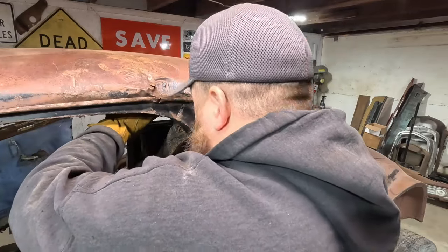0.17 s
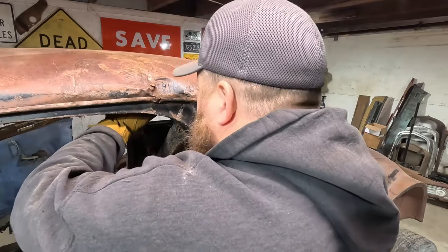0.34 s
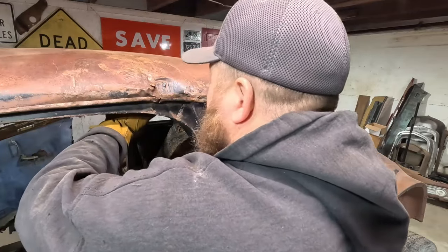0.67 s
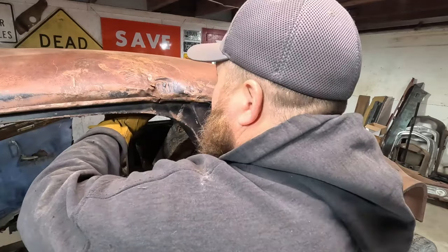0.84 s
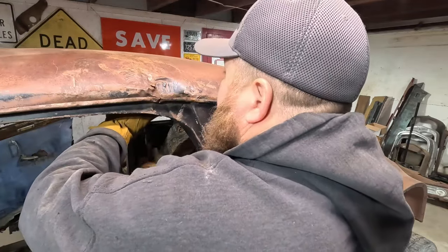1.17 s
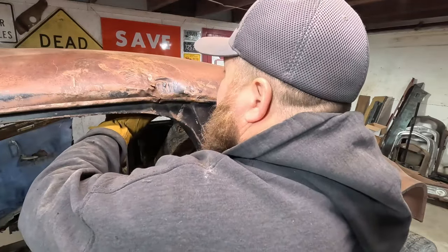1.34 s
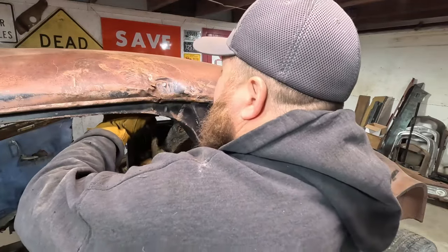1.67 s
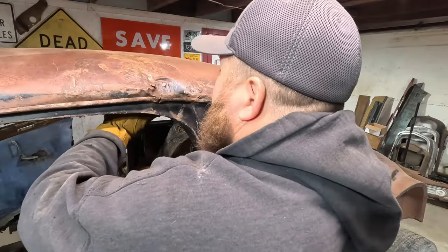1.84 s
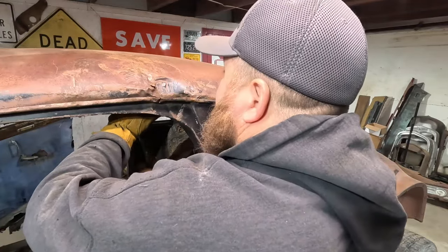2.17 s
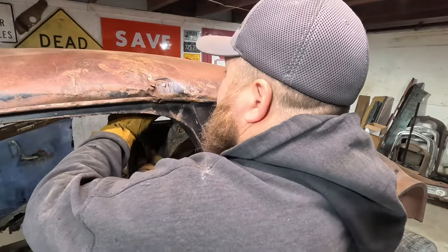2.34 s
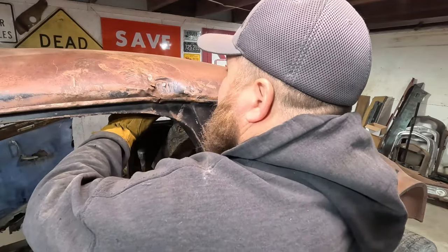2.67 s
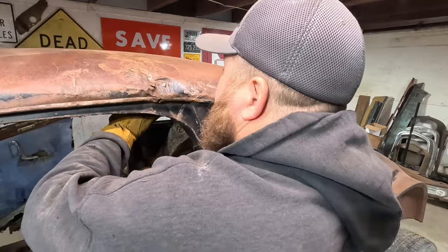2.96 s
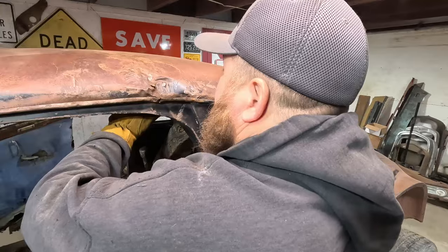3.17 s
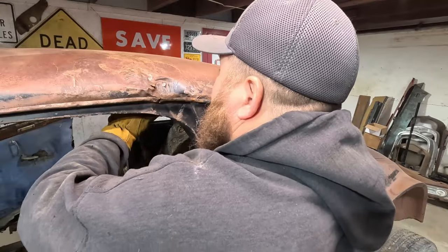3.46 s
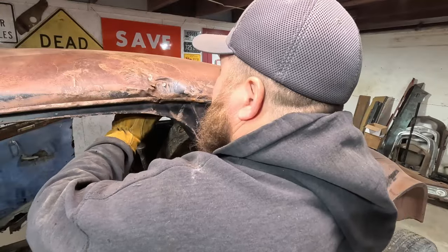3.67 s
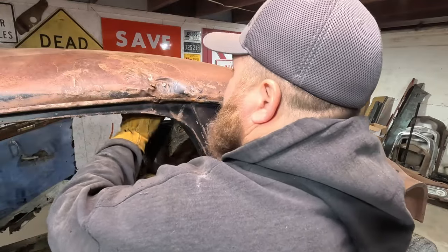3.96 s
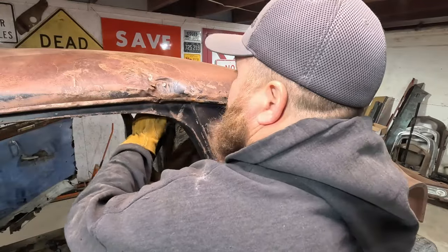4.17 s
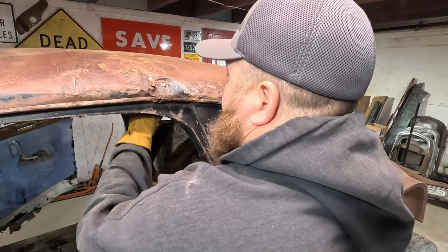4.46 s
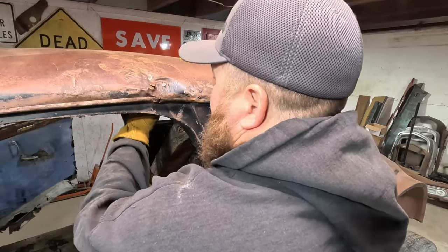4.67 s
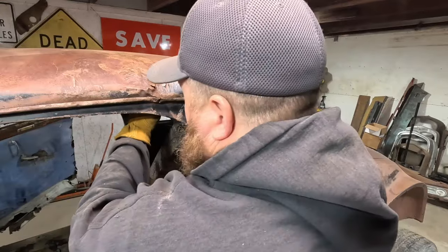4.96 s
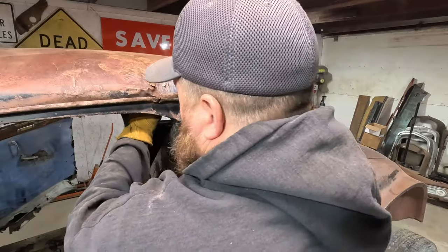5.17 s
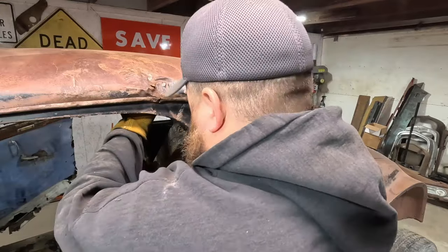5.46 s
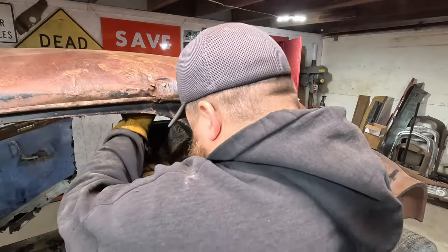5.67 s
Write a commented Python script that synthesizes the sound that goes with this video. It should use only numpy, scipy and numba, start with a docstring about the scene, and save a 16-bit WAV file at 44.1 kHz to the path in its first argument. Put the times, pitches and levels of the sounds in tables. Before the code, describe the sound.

A hammer strikes a chisel held against the sheet steel of an old car body in a workshop. The first blow lands at about 0.3 seconds, and five more follow at roughly 1.2, 1.6, 2.4, 2.9 and 3.3 seconds. Each is a sharp crack, after which the large panel booms and clangs, its ring fading over about a second. The second and fourth blows are somewhat softer. Small loose metal parts tinkle faintly, most clearly just before 1 second, along with a light knock.

After the last blow the ring sinks into a faint low drone. From about 4.4 to 5.7 seconds the tool is shifted, with quiet, irregular knocks, short dull rubs on the steel and a few tiny tinkles. A steady low room hum runs underneath throughout. A small microphone holds the loud ring down, and a very faint stutter comes just ahead of each blow.

```python
"""In a workshop, a hammer drives a chisel against the sheet steel of an old car body, six blows.
Each blow cracks, then the big panel booms and clangs in hundreds of close modes (its natural tones).
Afterwards the tool is shifted, knocking and rubbing on the steel. Loose parts tinkle and the room hums.
A small microphone with gain control holds the loud ring down, and a faint pre-echo from the
recorder's processing stutters just ahead of each blow."""
import sys
import numpy as np
from scipy import signal
from scipy.fft import rfft, irfft, next_fast_len
from scipy.io import wavfile
from scipy.ndimage import uniform_filter1d
from numba import njit

SR = 44100
rng = np.random.default_rng(int(sys.argv[2]) if len(sys.argv) > 2 else 0)


def transcribe(u):
    """Save the signal u as a 16-bit wav file named by the first command-line argument.

    u: samples, shape (n,) or (channels, n), limited to [-1, 1]; the rate is SR.
    q: integer samples, one column per channel.
    """
    v = np.clip(np.atleast_2d(u).T, -1, 1)
    q = np.round(v * 32767).astype(np.int16)
    wavfile.write(sys.argv[1], SR, q)


N = 256662
FFT_SIZE = next_fast_len(N)

# hammer blows: (time [s], crack [dB], ring [dB], brightness [dB/octave], clank [dB],
# clang of the high modes [dB], clang brightness [dB/octave], pre-echo against the blow [dB])
BLOWS = [(0.250, 2.5, -12, 0.6, -1, -8, 0.5, -7.5), (1.155, -5.5, -18.5, 0.06, 3, -6, -3.5, -31),
         (1.6256, -0.5, -13.5, 0.5, 1, -15.5, -0.5, -23), (2.396, -7.5, -20, 0.28, 5, -5.5, -4, -33.5),
         (2.8785, 1.5, -13, 0.73, -0.5, -18.5, 1.5, -24), (3.339, -2.5, -14.5, 1, 2, -7.5, -2.5, -30.5)]
# how strongly the panel's crowd of close modes rings: (frequency [Hz], level [dB])
CROWD_SPECTRUM = [(24, -61), (40, -28), (130, -20.5), (194, -1), (262, -10.5), (372, -6), (751, -18),
                  (873, -17.5), (1760, -26.5), (2440, -30), (4930, -39.5), (6020, -37), (6800, -43),
                  (9220, -68), (11800, -54), (16000, -118)]
# how long that crowd rings: (frequency [Hz], t60 or time to fade by 60 dB [s])
CROWD_T60 = [(60, 0.91), (200, 0.8), (500, 1.002), (1000, 0.72), (2500, 0.57), (6000, 0.47), (12000, 0.38)]

PRE_ECHO_S, PRE_ECHO_STEP_DB = 0.0106, -10.5  # pre-echo: a faint, stepped stutter ahead of each blow
CLATTER_HZ = 798  # above this the crowd of modes blurs into noise


def undb(db):
    """Turn decibels into a factor to multiply by."""
    return 10 ** (np.asarray(db, float) / 20)


def along(table, hz):
    """Read a (frequency, value) table, with every octave equally wide."""
    frequencies, values = np.transpose(table)
    return np.interp(np.log(hz), np.log(frequencies), values)


def coloured(table):
    """Noise of average (rms) size 1, shaped by a (frequency [Hz], level [dB]) table."""
    hz = np.maximum(np.fft.rfftfreq(FFT_SIZE, 1 / SR), 1)
    noise = irfft(rfft(rng.standard_normal(FFT_SIZE)) * undb(along(table, hz)), FFT_SIZE)[:N]
    return noise / noise.std()


def tilted(colour, db, brightness, clank_db=0, pivot_hz=900, clank_hz=2500):
    """Shift a colour table by db, tip it towards treble or bass, and add a bump for the clank."""
    hz, level = np.transpose(colour)
    clank = clank_db * np.exp(-(np.log2(hz / clank_hz) / 0.45) ** 2)
    return np.c_[hz, level + db + brightness * np.log2(hz / pivot_hz) + clank]


@njit
def ring(n, starts, gains, pole, rise):
    """Add up fading modes; each swells in as the wave fills the steel."""
    out = np.zeros(n)
    for mode in range(len(pole)):
        swing, held_back, event = 0j, 0j, 0
        for i in range(starts[0], n):
            while event < len(starts) and starts[event] == i:
                swing += gains[event, mode]
                held_back += gains[event, mode]
                event += 1
            out[i] += (swing - held_back).imag  # held_back dies sooner, so the tone swells
            swing = swing * pole[mode] + 1e-18
            held_back = held_back * rise[mode] + 1e-18
    return out


def play_modes(times, db, hz, t60, rise_s, phase):
    """Set modes ringing; db and phase have a row for each time and a column for each mode."""
    pole = np.exp(2j * np.pi * hz / SR - np.log(1000) / (t60 * SR))  # turn and fade per sample
    order = np.argsort(times)
    starts = (np.asarray(times)[order] * SR).astype(np.int64)
    gains = (undb(db) * np.exp(1j * phase))[order]
    return ring(N, starts, gains, pole, pole * np.exp(-1 / (rise_s * SR)))


@njit
def follow(x, attack, release):
    """Track loudness, rising fast and falling slowly."""
    level, out = 0., np.empty(len(x))
    for i in range(len(x)):
        level += (abs(x[i]) - level) * (attack if abs(x[i]) > level else release)
        out[i] = level
    return out


def room_hum(level_db=-51.5):
    """The workshop hums with a steady, low noise."""
    # colour of the hum: (frequency [Hz], relative level [dB])
    hum_colour = [(24, -51), (40, -24), (86, -10.5), (142, 4.5), (219, 9.5), (933, -17), (1120, -15),
                  (1970, -17.5), (3800, -26), (7680, -38.5), (9000, -78.5), (11700, -73.5), (19800, -120)]
    return undb(level_db) * coloured(hum_colour)


def tinkles(attack_s=0.004):
    """Small loose metal parts tinkle, each a narrow band of fading noise."""
    # tinkles: (time [s], pitch [Hz], level [dB], t60 [s], spread of pitch [Hz])
    loose_parts = [(.05, 3840, -61, 0.46, 900), (.745, 4840, -57, 0.27, 246), (.965, 3970, -50.5, 0.2, 60),
                   (.965, 1430, -46, 0.3, 29.5), (4.68, 6200, -62, 0.074, 200),
                   (4.89, 5600, -72, 0.12, 194), (5.698, 4660, -64.5, 0.89, 600)]
    size = SR // 2
    hz, age = np.fft.rfftfreq(size, 1 / SR), np.arange(size) / SR
    out = np.zeros(N)
    for time, centre_hz, db, t60, spread in loose_parts:
        band = irfft(rfft(rng.standard_normal(size)) * np.exp(-((hz - centre_hz) / spread) ** 2 / 2))
        envelope = undb(db - 60 * age / t60) * (1 - np.exp(-age / attack_s))
        start = int(time * SR)
        out[start:start + size] += (envelope * band / band.std())[:N - start]
    return out


def rubbing(attack_s=0.012, release_s=0.033, sag_db_per_s=20, drone_start_s=3.95, drone_db=-39.5):
    """Glove and tool stick and slip along the steel, while the handled panel drones ever fainter."""
    # rubbing strokes: (start [s], length [s], level [dB], treble against that level [dB])
    strokes = [(4.48, 0.14, -52, -15.5), (4.581, 0.097, -47, -9.5), (4.668, 0.23, -46, -20),
               (4.94, 0.12, -53, -13), (5.046, 0.19, -53.5, -14), (5.416, 0.11, -66.5, 6.5),
               (5.627, 0.089, -65.5, -0.5)]
    t = np.arange(N) / SR
    grain = undb(39 * uniform_filter1d(uniform_filter1d(rng.standard_normal(N), size=400), size=40))
    dull = coloured([(300, -18), (600, 2), (850, 13.5), (1100, -4.5), (1600, -33), (4000, -100)])
    treble = coloured([(700, -30), (1500, 2), (3000, -5), (5000, -13), (7500, -41), (9000, -55.5),
                       (12000, -110)])
    drone = coloured([(90, -56), (150, -15), (205, 1.5), (250, 0.5), (320, -9), (500, -36), (900, -83)])
    drone_age = t - drone_start_s
    out = drone * np.clip(drone_age / 0.12, 0, 1) * undb(drone_db - 3 * drone_age)
    for start, length, db, treble_db in strokes:
        age = np.maximum(t - start, 0)
        # each stroke sets in, slackens, and dies away once the hand stops
        shape = np.minimum(age / attack_s, 1) * np.exp(-np.maximum(age - length, 0) / release_s)
        out += shape * undb(db - sag_db_per_s * age) * grain * (dull + undb(treble_db) * treble)
    return out


def ring_events(knock_clang_db=-9, knock_decay_share=0.53):
    """List blows, pre-echoes and knocks: time, colour, clang (level, brightness), share of t60."""
    # light knocks of the tool: (time [s], ring [dB], brightness [dB/octave])
    knocks = [(0.933, -45.5, 0), (4.376, -72.5, 7.5), (4.43, -56.5, -3.5), (4.585, -52.5, -6),
              (4.678, -53.5, 2), (4.785, -52.5, -1.5), (4.866, -79, 4), (4.945, -54, -2.5),
              (5.04, -51, -1.5), (5.249, -61, 5.5), (5.449, -60.5, 3.5), (5.637, -64.5, 4.5)]
    # how a blow shares out over the ring: (frequency [Hz], level [dB])
    blow_colour = [(250, 2), (900, 0), (1500, -2.5), (2500, 2.13), (4000, 0.84), (6000, -3.7),
                   (11000, -4.5)]
    # how a knock shares out over the ring: (frequency [Hz], level [dB])
    knock_colour = [(250, 0.5), (900, -1.5), (2500, -8), (6000, -29), (11000, -45)]
    events = [(time, tilted(blow_colour, db, bright, clank), clang, 1)
              for time, _, db, bright, clank, *clang, _ in BLOWS]
    for time, _, db, bright, clank, clang_db, clang_bright, pre_echo_db in BLOWS:
        for k in range(4):  # steps of the pre-echo, the earlier the fainter
            drop_db = pre_echo_db + k * PRE_ECHO_STEP_DB
            colour = tilted(blow_colour, db + drop_db, bright, clank)
            events.append((time - (k + 1) * PRE_ECHO_S, colour, (clang_db + drop_db, clang_bright), 1))
    # the gloved hand rests on the steel and shortens the clatter of the knocks
    for time, db, bright in knocks:
        colour = tilted(knock_colour, db, bright)
        events.append((time, colour, (db + knock_clang_db, bright), knock_decay_share))
    times, colours, clang, decay_share = zip(*events)
    return np.array(times), colours, np.array(clang), np.array(decay_share)


def panel_clatter(level_db=-3, knock_rise_cycles=13, blow_rise_cycles=63):
    """The panel's high modes overlap into noise; each quarter octave fades at its own pace."""
    hz = np.maximum(np.fft.rfftfreq(FFT_SIZE, 1 / SR), 1)
    spectrum = rfft(rng.standard_normal(FFT_SIZE)) * np.sqrt(SR / 2)
    spectrum *= undb(level_db + along(CROWD_SPECTRUM, hz))
    times, colours, _, decay_share = ring_events()
    grid = np.arange(0, N + 16, 16)  # loudness is worked out every 16 samples
    age = np.maximum(grid / SR - times[:, None], 0)
    rise_cycles = np.where(decay_share < 1, knock_rise_cycles, blow_rise_cycles)[:, None]
    out = np.zeros(N)
    for centre_hz in CLATTER_HZ * 2 ** (np.arange(18) / 4):
        window = np.cos(np.pi / 2 * np.clip(4 * np.log2(hz / centre_hz), -1, 1))
        band = irfft(spectrum * window, FFT_SIZE)[:N]
        db = np.array([along(c, centre_hz) for c in colours]) + 1.5 * rng.standard_normal(len(times))
        t60 = along(CROWD_T60, centre_hz) * decay_share[:, None]
        swell = 1 - np.exp(-age * centre_hz / rise_cycles)
        power = (swell * undb(db[:, None] - 60 * age / t60)) ** 2
        out += band * np.interp(np.arange(N), grid, np.sqrt(power.sum(axis=0)))
    return out


def panel_ring(count=130, crowd_db=4, scatter_db=2, clang_hz=1500, bloom_s=0.17):
    """The sheet steel booms in a crowd of low modes and clangs in strong ones, in close threes."""
    # modes that stand out of the ring: (frequency [Hz], level [dB], t60 [s])
    strong_modes = [(135.6, -15, 1.2), (209.2, -3.5, 1.71), (226.7, -6.5, 2.1), (256, -6.5, 1.5),
                    (300.3, 1, 1.58), (367.5, 1, 1.04), (421.5, -6.5, 1.8), (498, 3, 1.1), (617.4, -3, 1.1),
                    (655, -5, 1.1), (814, -2.5, 0.92), (944, -6.5, 0.86), (1042, -5.5, 0.96),
                    (1350, -23.5, 1.5), (1549, -21.5, .7), (1895, -19.5, 0.67), (1920, -15, .6),
                    (2000, -8, 0.46), (2220, -8, 0.37), (2369, -17.5, 0.34), (2860, -6, 0.37),
                    (2940, -7.5, .3), (3120, -14, 0.26), (3860, -17.5, 0.54), (4280, -23, 0.62),
                    (4540, -20, .4), (5600, -20, 0.37), (5870, -12, 0.34), (6000, -15.5, 0.36),
                    (6200, -22.5, 0.3)]
    crowd_hz = 45 + (CLATTER_HZ - 45) * (np.arange(count) + rng.random(count)) / count
    centre_hz, strong_db, strong_t60 = np.repeat(strong_modes, 3, axis=0).T
    side = np.tile([-1, 0, 1], len(strong_modes))  # a weaker neighbour below and above each
    gap_hz = (3.5 + 0.00425 * centre_hz) * (1 + 0.33 * rng.standard_normal(len(side)))
    strong_hz = centre_hz + side * gap_hz
    crowd_t60 = along(CROWD_T60, crowd_hz) * np.exp(0.15 * rng.standard_normal(count))
    hz, t60 = np.r_[crowd_hz, strong_hz], np.r_[crowd_t60, strong_t60]
    mode_db = np.r_[crowd_db + along(CROWD_SPECTRUM, crowd_hz), strong_db - 8 * abs(side)]
    rise_s = 0.024 + 0.83 / hz
    rise_s[count:] += bloom_s * (strong_hz < clang_hz)  # the strong low modes fill in late
    times, colours, clang, _ = ring_events()
    clang_db = clang[:, :1] + clang[:, 1:] * np.log2(hz / clang_hz)
    event_db = np.where(hz > clang_hz, clang_db, [along(c, hz) for c in colours])
    # the tool never sits twice on the same spot, so each mode is pushed differently
    chance = rng.standard_normal((len(times), 2, len(hz)))
    db = mode_db + event_db + scatter_db * chance[:, 0]
    return play_modes(times, db, hz, t60, rise_s, phase=np.pi * chance[:, 1])


def chisel_cracks(snap_db=-9, snap_t60=0.023, slow_rise_hz=900):
    """Steel hits steel: a snap and a few very short modes; two faint pre-echo ticks come just before."""
    # modes of chisel and hammer: (frequency [Hz], level [dB], t60 [s])
    tool_modes = [(323, -2, .03), (515, 1, 0.03), (980, -3.5, 0.019), (1810, 0, 0.01), (2896, -4, 0.011),
                  (3937, -7, 0.013), (4810, -8, 0.0088), (5860, -9.5, 0.022), (10100, -23, 0.0017)]
    # snap of the contact: (frequency [Hz], relative level [dB])
    snap_colour = [(300, -22), (900, 12), (3000, 6.5), (6300, -4), (7500, -25), (12000, -28), (16000, -48)]
    blow_s, blow_db, pre_echo_db = np.transpose(BLOWS)[[0, 1, -1]]
    tick_db = blow_db + pre_echo_db - 8
    times = np.r_[blow_s, blow_s - PRE_ECHO_S, blow_s - 2 * PRE_ECHO_S]
    event_db = np.r_[blow_db, tick_db, tick_db + PRE_ECHO_STEP_DB]
    hz, mode_db, t60 = np.transpose(tool_modes)
    chance = rng.standard_normal((len(times), len(hz)))
    clicks = np.zeros(N)
    clicks[(times * SR).astype(int)] = undb(event_db + snap_db)
    snap_envelope = signal.lfilter([1], [1, -undb(-60 / (snap_t60 * SR))], clicks)
    rise_s = 5e-5 + slow_rise_hz / (2 * hz ** 2)  # low modes take a cycle or so to swing up
    db = event_db[:, None] + mode_db + 2 * chance
    tones = play_modes(times, db, hz * (1 + 0.023 * chance[0]), t60, rise_s, phase=1.3 * chance)
    return coloured(snap_colour) * snap_envelope + tones


def scene():
    """All the sounds of the workshop, added into one channel."""
    return (panel_ring() + panel_clatter() + chisel_cracks() + tinkles() + rubbing() + room_hum())[None]


def record(dry, hold_db=-22, ratio=1.61, attack_s=0.0011, release_s=0.022, lag_s=0.0064, ceiling=0.75):
    """Gain control turns loud sounds down a moment late; peaks are rounded, deep bass and top cut."""
    loudness = follow(dry[0], 1 / (attack_s * SR), 1 / (release_s * SR))
    late_loudness = np.interp(np.arange(N) - lag_s * SR, np.arange(N), loudness)
    gain = np.minimum(undb(hold_db) / (late_loudness + 1e-9), 1) ** (1 - 1 / ratio)
    rounded = ceiling * np.tanh(dry * gain / ceiling)
    bass_cut = signal.butter(3, 71.4, "high", fs=SR, output="sos")
    top_cut = signal.ellip(8, 0.2, 70, 16600, fs=SR, output="sos")
    return signal.sosfilt(top_cut, signal.sosfilt(bass_cut, rounded))


dry = scene()
out = record(dry)
transcribe(out)
```